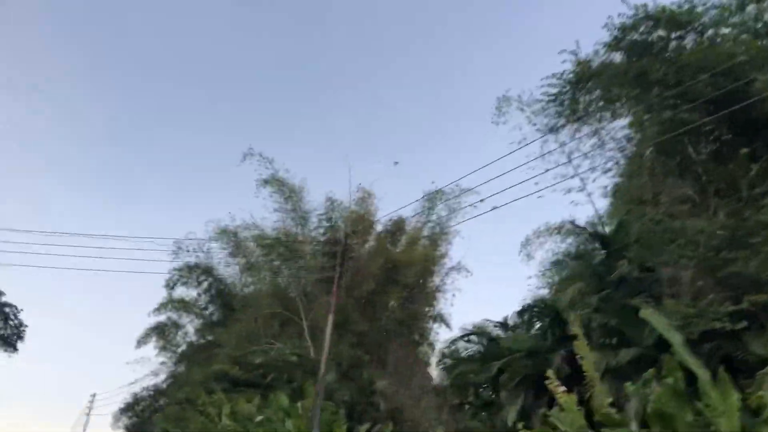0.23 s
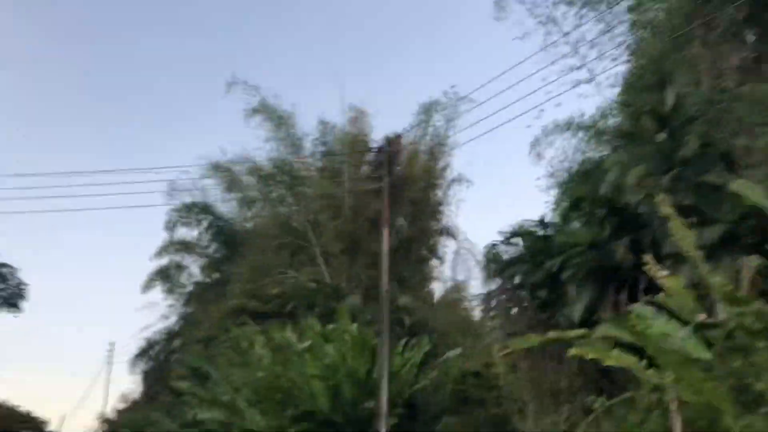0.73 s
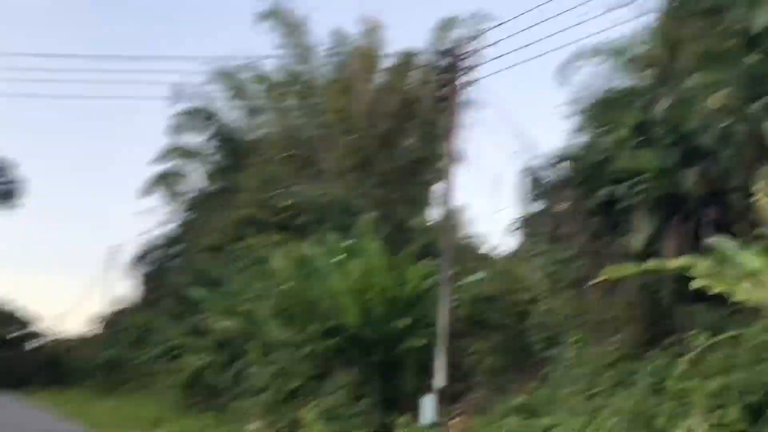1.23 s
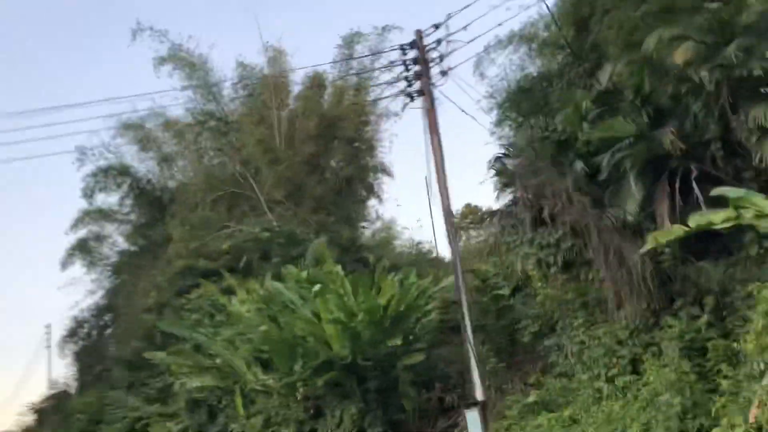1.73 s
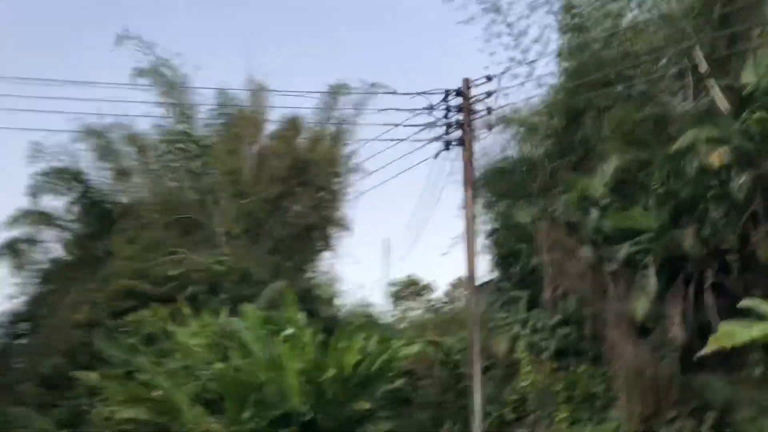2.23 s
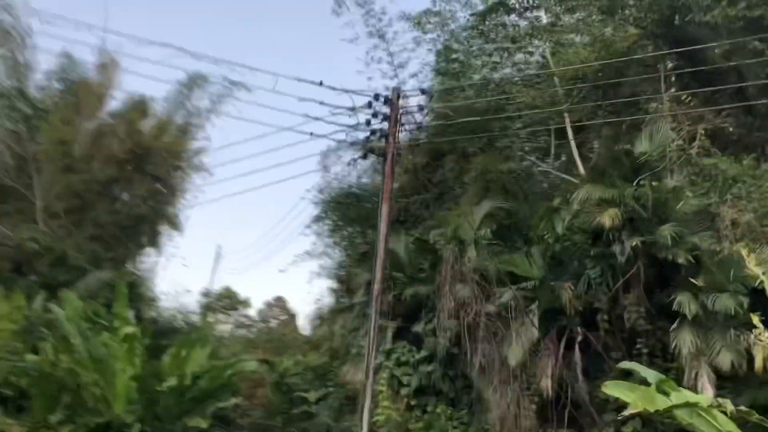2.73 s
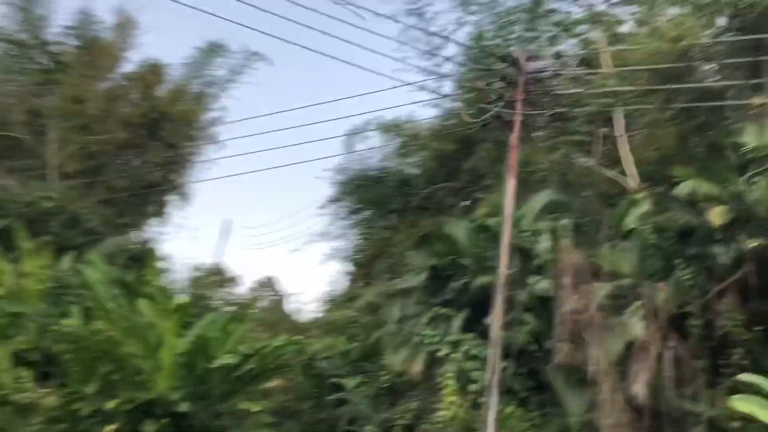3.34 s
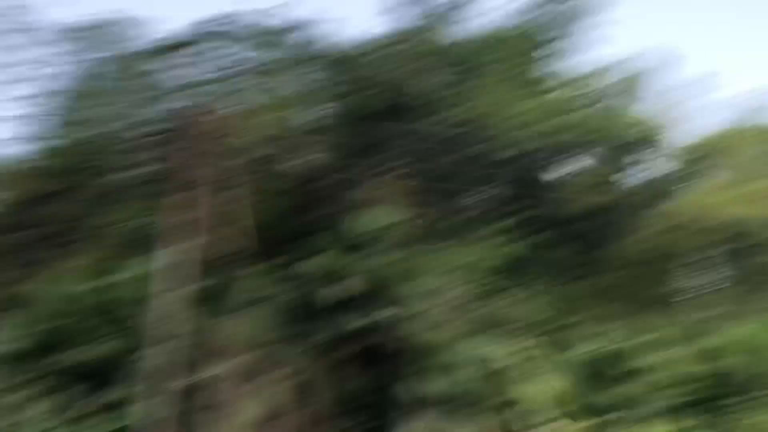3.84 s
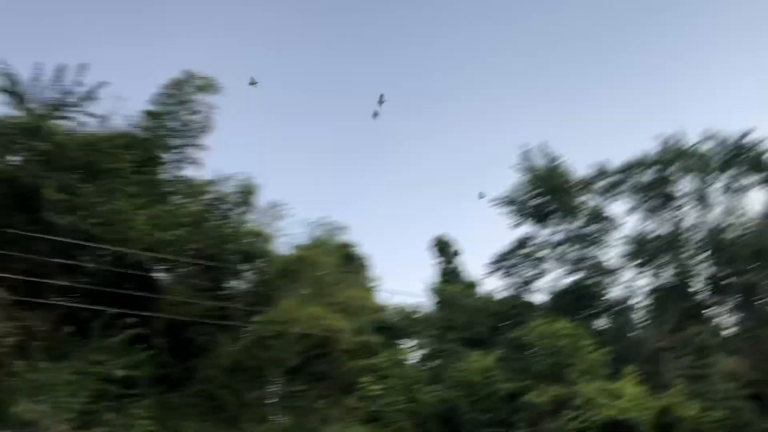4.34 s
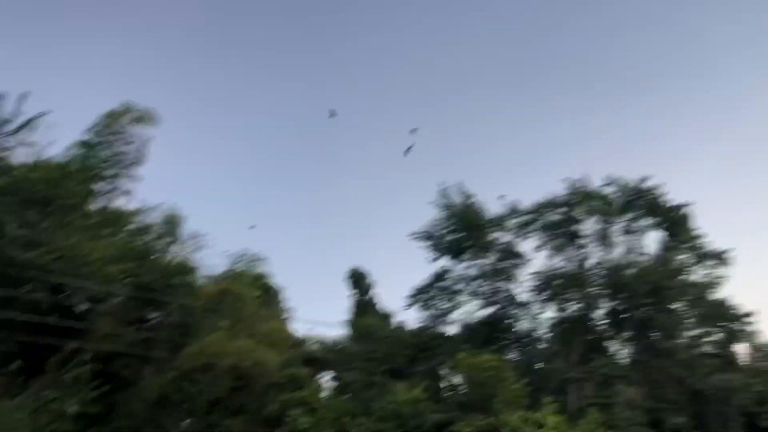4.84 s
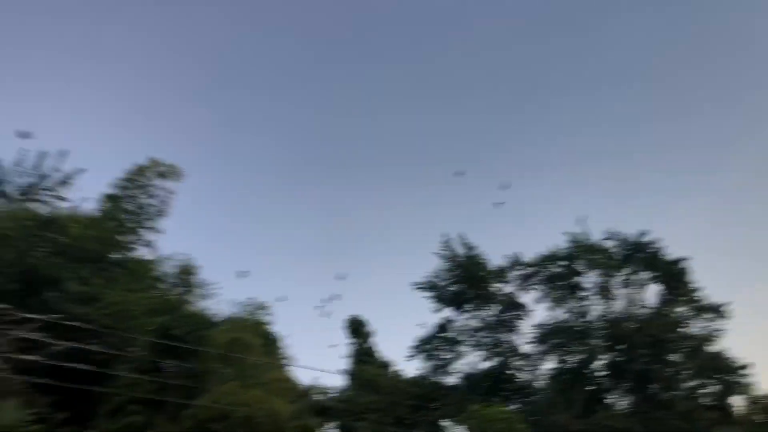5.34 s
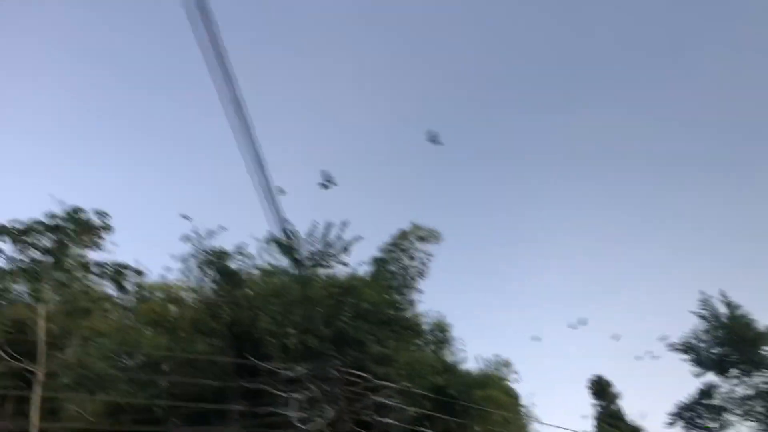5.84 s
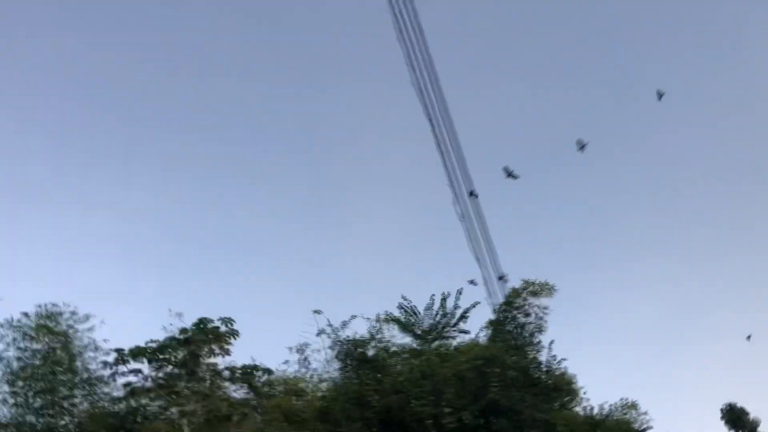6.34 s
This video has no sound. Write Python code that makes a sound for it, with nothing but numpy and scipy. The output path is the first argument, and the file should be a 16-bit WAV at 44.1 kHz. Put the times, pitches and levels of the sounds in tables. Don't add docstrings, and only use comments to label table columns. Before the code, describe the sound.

Outdoors by roadside trees, a flock of parrots chatters at a distance over faint low traffic hum. Quick falling chirps, thin peeps and rough low screeches scatter, then a short lull lets crickets and a katydid rasp. The birds fly in, growing dense, loud and bright, leafy echo behind them. The swinging handheld phone microphone picks up wind thumps, and wing tips clap near the end.

```python
import sys
import numpy as np
from scipy import signal
from scipy.fft import rfft, irfft
from scipy.io import wavfile
from scipy.ndimage import uniform_filter1d

SR = 44100
rng = np.random.default_rng(int(sys.argv[2]) if len(sys.argv) > 2 else 0)


def makeup_ratio(level_db):
    decades = np.asarray(level_db, float) / 20
    return 10 ** decades


def to_wav(sig):
    pcm = np.clip(np.atleast_2d(sig), -1, 1) * 32767
    pcm = np.round(pcm).astype(np.int16)
    wavfile.write(sys.argv[1], SR, pcm.T)


N = 290619


def rms_one(x):
    return x / np.sqrt(np.mean(x ** 2) + 1e-20)


def in_time(rows):
    s, *columns = np.transpose(rows)
    return [np.interp(np.arange(N) / SR, s, c) for c in columns]


def band(x, low_hz, high_hz, order=3):
    return signal.sosfilt(signal.butter(order, [low_hz, high_hz], "band", fs=SR, output="sos"), x)


def drift(rate_hz):
    r = np.exp(-2 * np.pi * rate_hz / SR)
    wander = signal.lfilter([1], [1, -2 * r, r * r], rng.standard_normal(N + SR))
    return rms_one(wander[SR:])


def coloured(spectrum):
    hz, level_db = np.transpose(spectrum)
    grid_hz = np.fft.rfftfreq(N, 1 / SR) + 1
    gain = makeup_ratio(np.interp(np.log(grid_hz), np.log(hz), level_db))
    return irfft(rfft(rng.standard_normal(N)) * gain, N)


# frequency in Hz, gain in dB.
BEAK = [(1500, -1.5), (2200, 0.5), (3300, -0.5), (4400, -5), (5500, -3), (7000, 2.5), (9000, 4),
        (11500, -6), (14000, -13), (15200, -11), (16000, -16)]


def calls(rows, overtones_db, wobble, rough, breath_db, fall=2.5, octave_fade_db_per_khz=14):
    out = np.zeros(N + 2 * SR)
    waver, flutter, sway = drift(87.0), drift(235), drift(15)
    breath = band(rng.standard_normal(N), 2100, 9300, order=2)
    onset_s, attack_s = .006, 0.0089
    multiples = np.arange(1, len(overtones_db) + 1)[:, None]
    for s, length_s, start_hz, end_hz, level_db, facing_db in rows:
        at = round((s - onset_s) * SR)
        u = np.arange(-onset_s / length_s, 1, 1 / (length_s * SR))
        near = (at + np.arange(len(u))) % N
        slide = (np.exp(-fall * u) - np.exp(-fall)) / (1 - np.exp(-fall))
        crack = 1 + 2 * (end_hz > 2800)
        hz = (end_hz + (start_hz - end_hz) * slide) * (1 + wobble * crack * waver[near])

        high = (multiples > 2) | (multiples * end_hz > 5600)
        own = (near + 9000 * multiples) % N
        turning_db = 2.6 * sway[own] - 7 * u + 1.5 - 60 * np.clip(.1 - u, 0, 1)
        above_khz = np.clip(2 * hz / 1000 - 5, 0, 1.5) * (end_hz > 1500)
        octave_db = 0.24 * (facing_db + 9.5) - octave_fade_db_per_khz * above_khz
        colour_db = np.interp(multiples * hz, *np.transpose(BEAK))
        colour_db = colour_db + turning_db * high + octave_db * (multiples == 2)
        gains = makeup_ratio(np.array(overtones_db)[:, None] + facing_db * high + colour_db)
        gains = gains * (multiples * hz < 17000) * (1 + .25 * flutter[own] * high)

        phase = 2 * np.pi * np.cumsum(hz) / SR
        voice = rms_one(np.sum(gains * np.sin(multiples * (phase + multiples)), axis=0))
        voice = voice + makeup_ratio(breath_db) * np.exp(-2.5 * (u - u[0])) * breath[near]
        shape = np.clip(np.minimum((u - u[0]) * length_s / attack_s, (1 - u) / 0.12), 0, 1)
        shape = shape * (1 + rough * flutter[near])
        out[SR + at:SR + at + len(u)] += makeup_ratio(level_db + 3.5) * shape * voice
    return out[SR:SR + N]


def shaped(rows, start, length_s=None, facing_db=None):
    rows = np.array(rows, float)
    if length_s is not None:
        rows = np.insert(rows, 1, length_s, axis=1)
    if facing_db is not None:
        rows = np.c_[rows, np.full(len(rows), facing_db)]
    return np.insert(rows, 2, np.multiply(start, rows[:, 2]), axis=1)


def trees(x):
    t60_s, cut_hz = 0.27, 10500
    t = np.arange(SR) / SR
    tail = rng.standard_normal(SR) * makeup_ratio(-60 * t / t60_s) * np.clip(t / 0.0014, 0, 1)
    dull = signal.lfilter(*signal.butter(1, cut_hz, fs=SR), tail)
    return signal.fftconvolve(x, dull / np.sqrt(np.sum(dull ** 2)))[:N]


def crowd(count, low_hz, high_hz, glide, spread_db):
    when, long, pitch, slide, far = rng.random((count, 5)).T
    end_hz = low_hz + (high_hz - low_hz) * pitch
    start_hz = end_hz * (1 + glide * slide)
    return np.c_[when * N / SR, .03 + .05 * long, start_hz, end_hz, spread_db * far, -22 - 8 * long]


# time in seconds, nearness as level in dB, shrillness in dB.
FLOCK = [(0, -34.5, 8), (.11, -44.5, -8), (.3, -45.5, -14), (.7, -40.5, 5.5), (.88, -41, 1),
         (1.08, -48.5, 9), (1.27, -43, -5), (1.5, -46.5, 4.5), (2.24, -50, 9), (2.46, -43, 8.5),
         (2.92, -39, 5.5), (3.47, -39, 5.5), (3.76, -32.5, 2.5), (4.35, -29.5, 2.5), (4.55, -27.5, 1.5),
         (5.89, -28.5, 1), (6.29, -26, 2), (6.44, -30.5, 2)]
# frequency in Hz, level in dB per Hz.
THROAT = [(290, -58), (500, -13.5), (829, -13), (944, -11), (1350, -10), (1810, -4.5), (2090, -1),
          (2830, -8.5), (4240, -4.5), (5500, -13.5), (6740, -18.5), (8010, -26.5), (8860, -22),
          (11200, -30), (15800, -33)]
CHIRP_OVERTONES = [1, 0, 1.5, -3.5, -1.5, 5.5, 11.5, 6]
SCREECH_OVERTONES = [-8.5, -1, -7, -0.5, 2, -1, -13.5, -13, -19, -47, -22]


def flock():
    chirp_rows = crowd(count=170, low_hz=1792, high_hz=2300, glide=.3, spread_db=12)
    chirps = rms_one(calls(chirp_rows, CHIRP_OVERTONES, 0.0119, 0.35, -20))
    buzz_rows = crowd(count=90, low_hz=741.3, high_hz=928.0, glide=-0.1008, spread_db=4.5)
    buzz_rows = buzz_rows + [0, 0, 0.5, 1, 0, 21]
    buzz = rms_one(calls(buzz_rows, SCREECH_OVERTONES, 0.0355, 0.42, -3))
    voices = makeup_ratio(-3) * chirps + makeup_ratio(-4) * buzz
    puffs = makeup_ratio(2.0 * drift(24.4))
    rasp = puffs * rms_one(coloured(THROAT))
    blur = makeup_ratio(-6) * voices + makeup_ratio(-2.0) * trees(voices) + makeup_ratio(3.0) * rasp

    mid_db, shrill_db = in_time(FLOCK)
    nearer_db = mid_db + 29
    low_db = -33.5 + 0.82 * nearer_db - 0.071 * shrill_db
    top_db = -41.5 + 1.35 * nearer_db + shrill_db
    out = np.zeros(N)
    for level_db, low_hz, high_hz in [(low_db, 627, 3100), (mid_db, 2870, 6340), (top_db, 6080, 22000)]:
        part = band(blur, low_hz, high_hz)
        loudness = np.sqrt(uniform_filter1d(part ** 2, size=3500) + 1e-9)
        out += makeup_ratio(level_db) * part / loudness
    return out


# frequency in Hz, level in dB per Hz.
HUM = [(15, -46), (25, 5), (70, -12.5), (157, 1), (342, -10), (1090, -15.5), (1430, -11.5), (1780, -20),
       (2150, -31), (2730, -58), (4330, -21), (8050, -84), (9460, -42), (11400, -37), (15800, -38)]


def background():
    hum = coloured(HUM)
    return makeup_ratio(-47) * hum / np.std(band(hum, 25, 1340))


# start in seconds, length in seconds, settled Hz, level in dB, beak facing in dB.
PINCHED = [
    (-.014, 0.052, 1935, -39, -16),
    (.046, .03, 2210, -44, -32),
    (.343, 0.038, 2085, -45.5, -36),
    (.79, .035, 1965, -45, -32),
    (.855, .025, 1990, -48, -30),
    (1.2, 0.043, 2160, -50.5, -33),
]
PINCHED_START = [1.3, 1.03, 1.05, 1.25, 1.03, 1.04]
PINCHED_OVERTONES = [-2, 11, 4, 9, 0, 8, 4, -19]


def pinched_chirps():
    rows = shaped(PINCHED, PINCHED_START)
    return calls(rows, PINCHED_OVERTONES, 0.011, 0.25, -22, octave_fade_db_per_khz=0)


def plain(rows):
    return calls(rows, CHIRP_OVERTONES, 0.007, 0.22, -24)


# start in seconds, length in seconds, settled Hz, level in dB, beak facing in dB.
HELD = [(.01, 0.016, 2050, -46, -30), (.312, 0.028, 2190, -43.5, -31), (.428, 0.084, 1874, -45.5, -34),
        (.539, 0.065, 2150, -47, -39), (.685, 0.035, 2080, -48, -33), (.835, .031, 2310, -50, -11),
        (.925, 0.078, 2230, -43.5, -16.5), (1.02, .13, 2050, -45, -35), (1.16, .07, 2100, -48, -39),
        (1.235, 0.047, 2090, -42, -37), (1.295, 0.031, 1987, -42.5, -34), (1.275, 0.03, 2250, -52, -22),
        (1.488, 0.02, 2270, -40.5, -29), (2.026, 0.031, 2035, -50, -28), (2.206, 0.079, 2080, -51, -28),
        (2.448, 0.028, 2220, -46, -28), (2.694, 0.033, 1903, -44, -32), (3.942, 0.091, 2083, -40, -19),
        (4.376, 0.048, 2167, -40, -24), (5.678, 0.04, 2106, -34, -30)]


def held_notes():
    return plain(shaped(HELD, 1.03))


# start in seconds, length in seconds, settled Hz, level in dB, beak facing in dB.
SCREECHES = [(.147, 0.064, 830, -46, 19), (.659, .02, 890, -49, -5), (.862, 0.021, 876, -47, 13),
             (1.31, 0.075, 834, -45.5, 9), (1.491, 0.056, 864, -47.5, 13), (2.257, 0.077, 845, -54, 5),
             (2.538, 0.061, 812, -44.5, 8), (2.695, 0.046, 854, -42, 15), (2.817, 0.024, 790, -40, 13),
             (2.96, 0.12, 840, -43, 11), (3.17, 0.085, 844, -44.5, 27), (3.272, 0.061, 824, -39, 15),
             (3.46, 0.066, 808, -41, 10), (3.508, 0.069, 885, -41, 26), (3.727, 0.062, 827, -37, 25),
             (4.005, 0.097, 833, -42, 21), (4.322, 0.057, 851, -40, 13.5), (5.16, 0.11, 846, -37, 13),
             (5.805, 0.076, 821, -34, 6), (5.5, 0.058, 810, -37.5, 7), (6.03, .06, 847, -47, 12),
             (6.24, 0.086, 811, -36, 13), (.43, 0.083, 900, -53, 6), (6.561, 0.042, 818, -37, -0.5)]


def screeches():
    return calls(shaped(SCREECHES, 0.99), SCREECH_OVERTONES, 0.028, 0.45, -11)


NASAL_OVERTONES = [0, 5, 4, -2, -0.5, 2.5, 4.5, -19]
# start in seconds, length in seconds, settled Hz, level in dB, beak facing in dB.
STEEP = [
    (.187, .045, 2170, -38.5, -22),
    (3.806, .06, 2040, -33, -20),
]


def steep_chirps():
    return calls(shaped(STEEP, 1.5), NASAL_OVERTONES, 0.011, .3, -22, fall=4.2, octave_fade_db_per_khz=6)


# start in seconds, length in seconds, settled Hz, level in dB, beak facing in dB.
DEEP = [(3.726, .045, 2120, -37, -14), (.292, 0.05, 2280, -52, -32), (.692, 0.067, 2087, -40, -22),
        (.786, 0.04, 1965, -44.5, -15), (2.924, 0.05, 2074, -41.5, -28), (3.258, 0.045, 2050, -35.5, -23),
        (3.355, 0.044, 1964, -35, -22), (3.765, 0.048, 1986, -36, -20), (4.37, 0.058, 1928, -32, -22),
        (4.604, 0.058, 1950, -37, -21), (4.729, 0.056, 2010, -31.5, -15), (4.885, 0.0355, 2093, -31, -19),
        (4.948, 0.05, 2005, -30.5, -10.5), (5.315, 0.054, 1950, -30, -37), (5.253, 0.05, 1977, -29.5, -13),
        (5.893, 0.056, 1896, -31.5, -9), (5.989, 0.036, 1930, -38, -21), (6.325, 0.072, 1960, -29.5, -11)]


def deep_chirps():
    return plain(shaped(DEEP, 1.25))


# start in seconds, settled Hz, level in dB, beak facing in dB.
SHORT = [(5.502, 2020, -40, -23), (6.49, 2120, -40.5, -28), (4.3, 1950, -38.5, -28),
         (.892, 2390, -44.5, -18), (1.345, 1950, -44.5, -18), (2.095, 2300, -50.5, -26),
         (2.317, 2300, -53, -28), (.72, 2057, -43.5, -24), (2.8, 2190, -46, -24), (2.648, 2150, -44, -30),
         (2.42, 2150, -50, -25), (3.96, 2050, -39, -25), (4.4, 1950, -35, -25), (5.78, 2080, -34, -15),
         (5.0, 1980, -41, -36), (5.13, 2090, -34.5, -22), (3.939, 2100, -38.5, -12),
         (4.077, 2200, -41, -11), (4.439, 1855, -35, -20), (4.496, 1860, -33, -16), (4.633, 2057, -33, -18),
         (4.684, 2115, -31.5, -13.5), (4.867, 2114, -31, -20), (5.372, 2020, -33, -24),
         (5.432, 1980, -37, -17.5), (5.925, 1900, -34, -28), (6.085, 1600, -40, -24), (5.5, 2090, -35, -18)]


def short_chirps():
    return plain(shaped(SHORT, 1.14, length_s=0.0455))


# start in seconds, length in seconds, settled Hz, level in dB.
SQUEAKS = [(.727, 0.067, 3180, -50), (.982, 0.06, 3530, -56), (1.284, 0.11, 3360, -62),
           (2.392, .048, 3430, -56), (2.511, .045, 3330, -63), (2.799, 0.044, 3390, -46),
           (3.086, 0.03, 3270, -44.5), (3.307, 0.053, 3530, -45), (3.334, 0.038, 3140, -38.5),
           (3.514, 0.051, 3500, -42), (3.607, 0.044, 3470, -45), (3.7, 0.079, 3580, -45),
           (3.9, 0.04, 3380, -42.5), (4.041, 0.027, 3540, -49), (4.666, 0.031, 3460, -41),
           (4.714, 0.19, 3520, -55), (4.81, 0.064, 3400, -40), (5.51, .066, 3280, -39.5),
           (4.266, .035, 3200, -43), (4.195, 0.032, 3500, -43), (4.93, 0.023, 3300, -34),
           (5.42, 0.028, 4400, -36), (6.055, 0.031, 3500, -39)]


def squeaks():
    return plain(shaped(SQUEAKS, 0.99, facing_db=-18.5))


# start in seconds, length in seconds, settled Hz, level in dB.
PEEPS = [
    (.986, .02, 2900, -51),
    (1.634, 0.029, 3670, -47.5),
    (1.868, .03, 3400, -56),
]


def peeps():
    return plain(shaped(PEEPS, 1.36, facing_db=-30))


# start in seconds, length in seconds, settled Hz, level in dB, beak facing in dB.
SWOOPS = [(1.528, 0.092, 1883, -40.5, -16.5), (4.046, .05, 1966, -35.5, -25), (6.134, 0.06, 1995, -33, -22),
          (6.199, 0.046, 1975, -36, -17), (4.529, 0.041, 2200, -41, -28), (4.813, 0.045, 2130, -38, -18),
          (5.262, .04, 2005, -39, -11), (5.574, .025, 2250, -31, -35), (5.612, .052, 2054, -34, -30),
          (5.87, 0.047, 2100, -27.5, -19), (6.314, .03, 2200, -31, -19), (6.405, 0.062, 1972, -28.5, -14)]


def swoops():
    return plain(shaped(SWOOPS, 1.45))


# start in seconds, length in seconds, settled Hz, level in dB, beak facing in dB.
NASAL = [(2.74, .078, 1900, -36, -14), (2.998, .04, 2040, -35, -26), (5.586, .08, 1870, -29, -13),
         (3.094, 0.042, 2026, -40.5, -30), (3.543, 0.059, 2044, -34, -16), (3.655, 0.0454, 2070, -41, -24),
         (4.241, .055, 1980, -37.5, -13), (4.085, 0.051, 2030, -36, -18)]


def nasal_swoops():
    return calls(shaped(NASAL, 1.33), NASAL_OVERTONES, 0.01, 0.23, -22, octave_fade_db_per_khz=2)


def near_birds():
    direct = pinched_chirps() + held_notes() + screeches() + steep_chirps() + deep_chirps()
    direct = direct + short_chirps() + squeaks() + peeps() + swoops() + nasal_swoops()
    return direct + makeup_ratio(-7) * trees(direct)


def insect(start_s, end_s, rate_hz, hz, width, level_db):
    t = np.arange(N) / SR
    throb = np.clip(np.cos(2 * np.pi * rate_hz * (t - start_s - .012)), 0, 1)
    throb = throb * (t > start_s) * (t < end_s)
    rasp = band(rng.standard_normal(N), hz * (1 - width), hz * (1 + width), order=2)
    return makeup_ratio(level_db) * throb * rms_one(rasp)


# start in seconds, end in seconds, throbs per second, pitch in Hz.
CRICKETS = [
    (.97, 1.145, 62, 5500),
    (1.79, 2.09, 62, 6050),
    (2.05, 2.25, 62, 5500),
]


def crickets():
    return sum(insect(*row, width=.008, level_db=-53) for row in CRICKETS)


# start in seconds, end in seconds, throbs per second, pitch in Hz.
KATYDID = (1.67, 2.17, 23.5, 11600)


def katydid():
    return insect(*KATYDID, width=.1, level_db=-63)


# start in seconds, hold in seconds, level in dB.
GUSTS = [(3.83, .3, -49), (4.17, 0.15, -34), (4.3, 0.056, -28), (4.7, .01, -36.5), (4.83, 0.0087, -36.5),
         (5.0, .42, -48.5), (5.52, 0.04, -42.5), (5.66, .02, -41.5), (5.8, 0.12, -41.5), (5.95, .4, -45.5),
         (6.43, .04, -36), (6.53, .08, -41.5)]


def gust_gain():
    rise_db_per_s, fall_db_per_s = 228, 136
    t = np.arange(N) / SR
    levels_db = []
    for s, held_s, level_db in GUSTS:
        before_s, after_s = np.clip(s - t, 0, None), np.clip(t - s - held_s, 0, None)
        levels_db.append(level_db - rise_db_per_s * before_s - fall_db_per_s * after_s)
    return makeup_ratio(np.max(levels_db, axis=0))


# start in seconds, peak in dB, pitch in Hz.
THUMPS = [(4.153, -27, 123), (4.189, -17, 247), (4.226, -18, 307), (4.272, -19.5, 243), (4.324, -7.5, 450),
          (4.351, -40, 139), (4.404, -15, 220), (5.659, -28, 150), (6.449, -23, 141)]


def wind():
    lumps = band(rng.standard_normal(N), 36, 288, order=2) * makeup_ratio(3.7 * drift(41))
    out, t = gust_gain() * rms_one(lumps), np.arange(2000) / SR
    for s, peak_db, hz in THUMPS:
        at = round(s * SR)
        out[at:at + len(t)] += makeup_ratio(peak_db + 1.5) * np.sin(2 * np.pi * hz * t) * np.exp(-t * hz / 0.5)
    return out


# start in seconds, peak in dB.
CLAPS = [(5.531, -15), (5.573, -22), (5.832, -14), (4.954, -20), (6.09, -23), (6.574, -18.5)]


def wing_claps():
    decay_s, length = .0012, 600
    out, t = np.zeros(N + length), np.arange(length) / SR
    for s, peak_db in CLAPS:
        at = round(s * SR)
        out[at:at + length] += makeup_ratio(peak_db - 10) * rng.standard_normal(length) * np.exp(-t / decay_s)
    return band(out[:N], 1500, 15000, order=1)


def scene():
    mix = flock() + background() + near_birds() + crickets() + katydid() + wind() + wing_claps()
    return mix[None]


def top_cut(x):
    return signal.sosfilt(signal.butter(12, 16650, fs=SR, output="sos"), x)


def record(dry):
    x = signal.sosfilt(signal.butter(4, 48, "high", fs=SR, output="sos"), dry)
    x = irfft(rfft(x) * (np.fft.rfftfreq(N, 1 / SR) < 15725), N)
    return top_cut(x)


dry = scene()
out = record(dry)
to_wav(out)
```